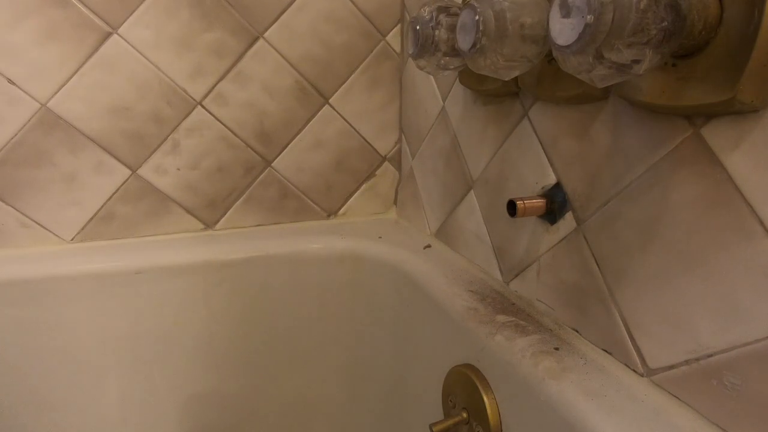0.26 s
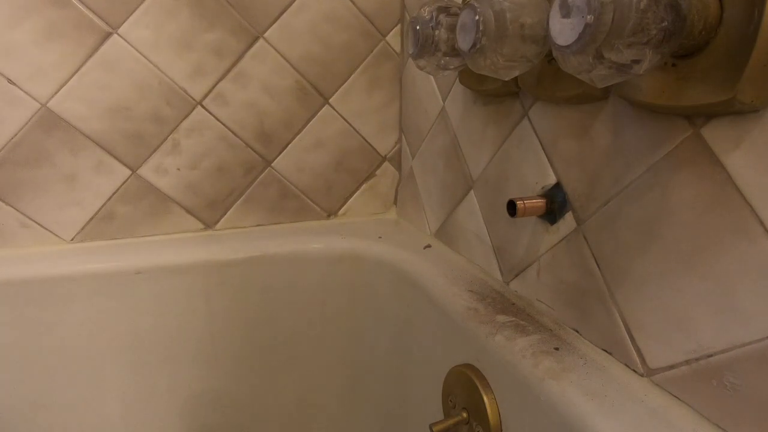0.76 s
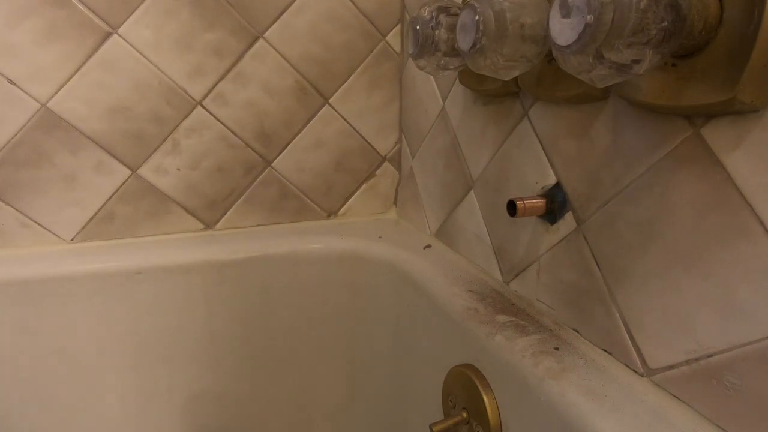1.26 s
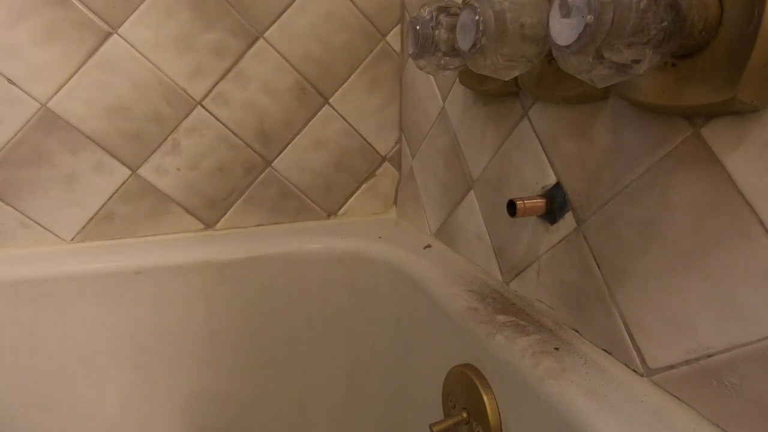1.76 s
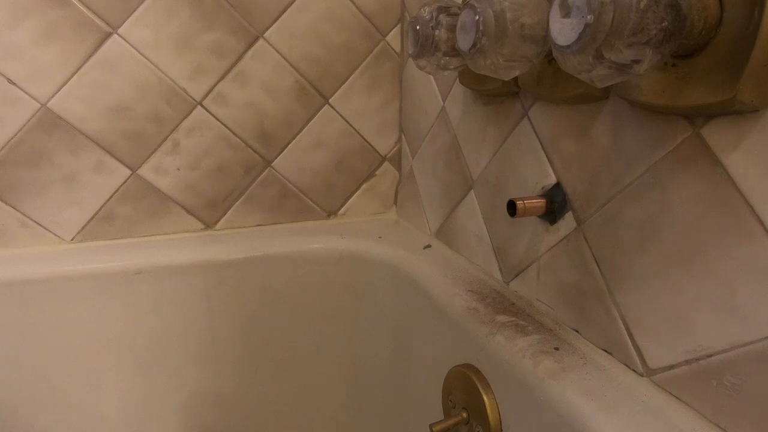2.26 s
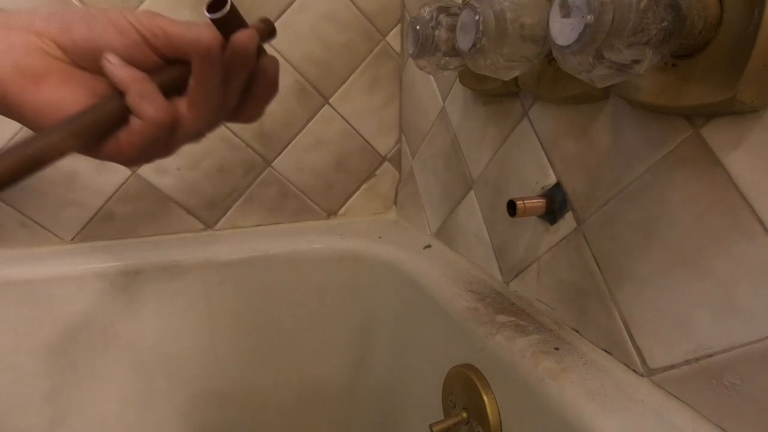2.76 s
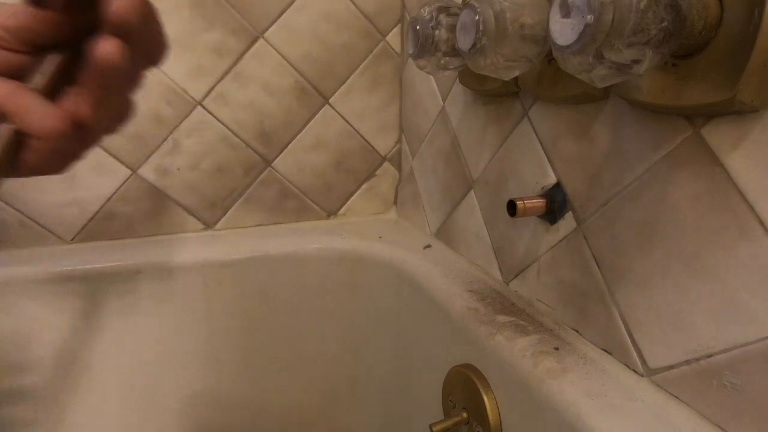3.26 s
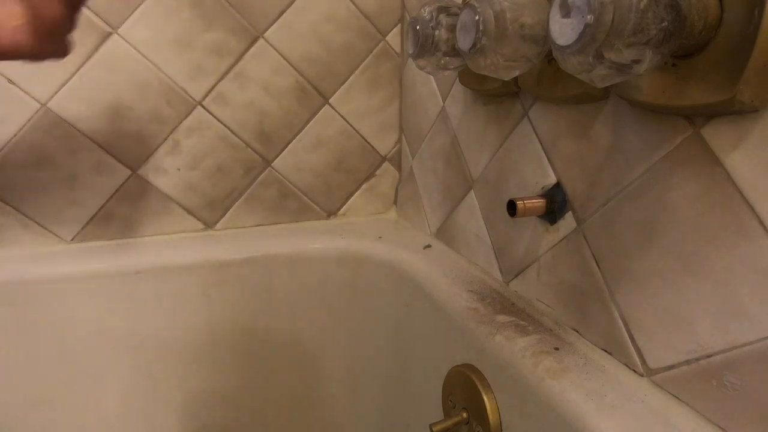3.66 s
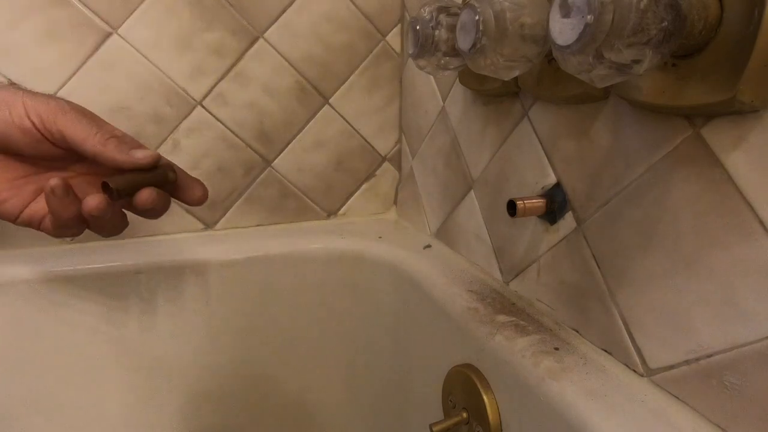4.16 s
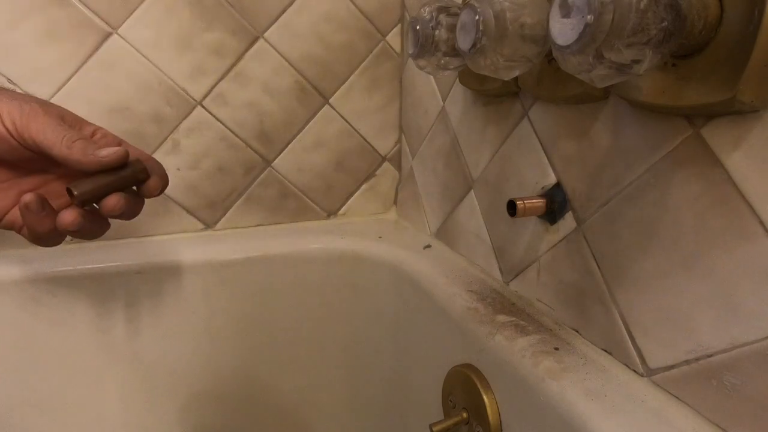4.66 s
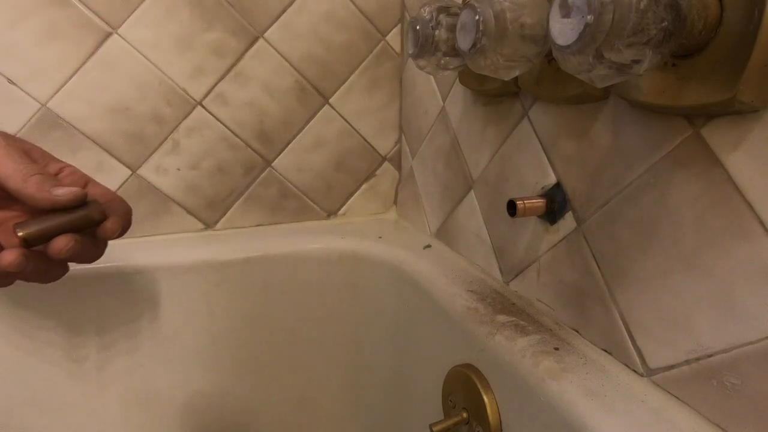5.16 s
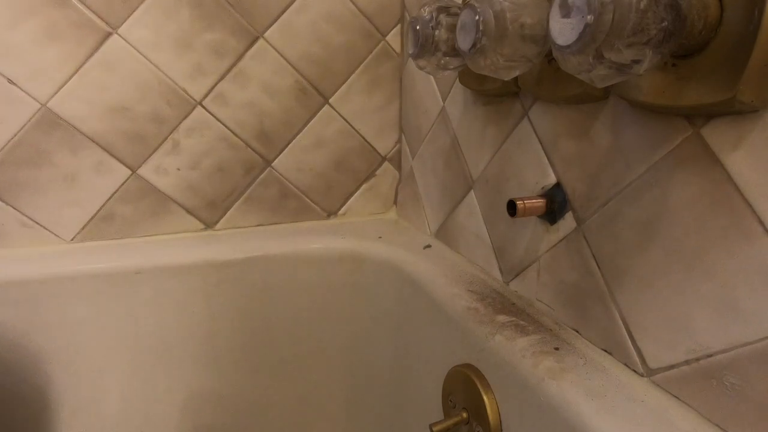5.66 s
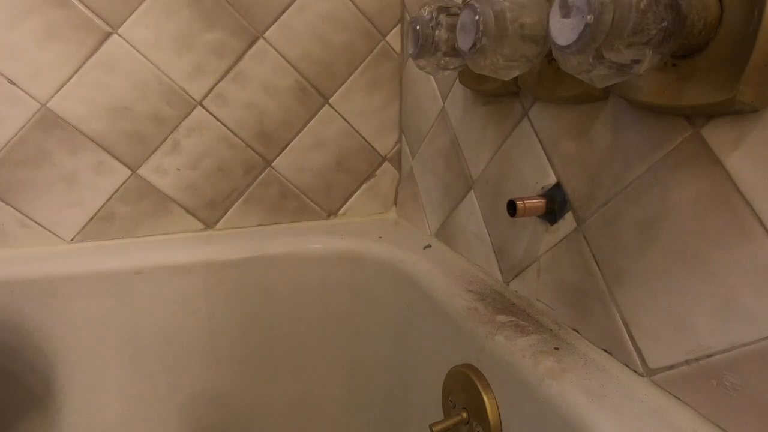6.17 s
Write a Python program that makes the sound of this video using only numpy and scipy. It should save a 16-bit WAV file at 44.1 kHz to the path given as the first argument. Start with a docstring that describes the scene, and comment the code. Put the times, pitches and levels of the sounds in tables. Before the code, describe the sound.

Small metal clicks, a few booming knocks on a tub and two bright, ringing scrapes of copper pipe in a tiled bathroom.

```python
"""A small tiled bathroom, plumbing work over the tub, heard on a stereo pair of microphones.
Above a low, uneven rumble and the room's hush, a tubing cutter clicks, rubs and faintly squeaks on
a copper pipe. It is put down with a few roomy knocks, and the tub booms close by, to the right.
A short copper offcut then sticks and slips along a hard edge in two main strokes, ringing brightly
near the microphones. A last light tap follows from farther off."""
import sys
import numpy as np
from scipy import signal
from scipy.fft import rfft, irfft
from scipy.io import wavfile
from scipy.ndimage import uniform_filter1d

SR = 44100
rng = np.random.default_rng(int(sys.argv[2]) if len(sys.argv) > 2 else 0)


def digitize_waveform(pressure):
    """Quantize a signal to 16-bit integers and store it at the path in sys.argv[1].

    Rows of a 2-D input are taken as channels; values are limited to [-1, 1].
    """
    field = np.atleast_2d(pressure).T
    bounded = np.clip(field, -1, 1)
    quanta = np.round(bounded * 32767).astype(np.int16)
    wavfile.write(sys.argv[1], SR, quanta)


N = 282681


def from_db(db):
    """Decibels to gain."""
    return 10 ** (np.asarray(db) / 20)


def rms_one(x):
    """Scale to rms 1."""
    return x / np.sqrt(np.mean(x ** 2) + 1e-20)


def energy_one(x):
    """Scale a response so that white noise keeps its level through it."""
    return rms_one(x) / np.sqrt(x.shape[-1])


def at_hz(points, hz):
    """Read a table on a log-frequency axis."""
    f, value = np.transpose(points)
    return np.interp(np.log(np.maximum(hz, 1)), np.log(f), value)


def drift(per_s):
    """A random wander between knots of spread 1."""
    knots = rng.standard_normal(int(N / SR * 200))
    return np.interp(np.arange(N) / SR * per_s, np.arange(len(knots)), knots)


def through(x, response):
    """Pass a signal through a response."""
    return signal.fftconvolve(x, response, axes=-1)[..., :N]


def add(track, start_s, sound):
    """Lay a short sound into a track."""
    i = max(round(start_s * SR), 0)
    track[i:i + len(sound)] += sound[:N - i]


def bandpass(x, edges_hz):
    """Keep the band between two edges."""
    return signal.sosfilt(signal.butter(2, edges_hz, "band", fs=SR, output="sos"), x)


def colour(spectrum, extra_db=lambda hz: 0, size=8192):
    """Causal (minimum-phase) response of energy 1 with the given spectral shape."""
    hz = np.maximum(np.arange(size // 2 + 1) * SR / size, 1)
    cepstrum = irfft(np.log(from_db(at_hz(spectrum, hz) + extra_db(hz))))
    cepstrum[0], cepstrum[size // 2:] = 0, 0
    return energy_one(irfft(np.exp(rfft(2 * cepstrum))))


def hump(hz, centre_hz, octaves, skirt_db=11):
    """A broad spectral hump, in dB."""
    return -skirt_db * np.log10(1 + (np.log2(hz / centre_hz) / octaves) ** 4)


def lift(hz, peaks):
    """Bell-shaped peaks or dips in a spectrum, in dB."""
    return sum(db / (1 + (2 * (hz - centre) / width) ** 2) for centre, width, db in peaks)


def panned(x, pan_db):
    """Place a sound between the microphones; pan_db is left minus right."""
    return x * from_db([[pan_db / 2], [-pan_db / 2]])


# spectrum of the rumble: f/Hz, relative level/dB
RUMBLE_SPECTRUM = [(15, -38), (24, -22), (34, -4.5), (44, -4.5), (63, 5.5), (72, -8.5), (90, -5), (103, 0),
                   (119, -3), (133, -13), (160, -16.5), (260, -69.5)]
# its swells and dips, in two consecutive runs: t/s, level/dB
RUMBLE_SWELLS = [
    [(0.0, -37), (0.19, -49.5), (0.47, -41.5), (0.53, -57.5), (0.58, -39.5), (1.41, -44), (2.16, -44.5),
     (2.18, -56), (2.5, -38)],
    [(2.85, -39.5), (3.75, -55), (3.76, -44), (4.79, -40), (4.98, -52.5), (5.96, -37), (6.06, -60.5),
     (6.12, -43.5), (6.41, -37)],
]
def rumble(pan_db=-8, side_db=-18, steady_s=0.25, waver_db=3.0):
    """Low noise wavers in the room's lowest resonances, stronger at the right microphone."""
    white = rng.standard_normal((2, N + SR))
    mid, side = signal.fftconvolve(white, colour(RUMBLE_SPECTRUM)[None], axes=-1)[:, SR:SR + N]
    pair = mid + from_db(side_db) * side * [[1], [-1]]
    steady = pair / np.sqrt(uniform_filter1d(mid ** 2, int(steady_s * SR)) + 1e-3)
    swell_db = np.interp(np.arange(N) / SR, *np.vstack(RUMBLE_SWELLS).T)
    return panned(steady * from_db(swell_db + waver_db * drift(14)), pan_db)


# likeness of the two microphones: f/Hz, correlation (clipped to -1..1)
MIC_LIKENESS = [(60, -1), (130, 1.75), (290, -0.32), (640, -0.93), (1300, -0.26), (2800, 0.47),
                (6800, -0.16), (14000, -1)]
# their balance: f/Hz, left minus right level/dB
MIC_BALANCE = [(60, -6.5), (200, -7), (400, -3), (800, -3), (2400, -0.5), (4500, -1.5), (8000, 0),
               (14000, 3.5)]
BAND_EDGES_HZ = 20 * 2 ** np.arange(0, 10, .5)
def diffuse_bands(size):
    """Half-octave bands of white noise as the two microphones hear a diffuse field."""
    white = rng.standard_normal((2, 2, size + SR // 2))
    sides = np.array([[1], [-1]])
    for k, edges in enumerate(zip(BAND_EDGES_HZ, BAND_EDGES_HZ[1:])):
        mid, side = bandpass(white[k % 2], edges)[:, -size:]
        hz = np.sqrt(np.prod(edges))
        alike = np.clip(at_hz(MIC_LIKENESS, hz), -1, 1)
        pan = rms_one(from_db(sides * at_hz(MIC_BALANCE, hz) / 2))
        yield hz, pan * (np.sqrt(1 + alike) * mid + np.sqrt(1 - alike) * side * sides)


# spectrum of the room's hush: f/Hz, relative level/dB
HUSH_SPECTRUM = [(100, -15.5), (150, 0.5), (200, 0.5), (245, 5.5), (330, -5), (440, -11.5), (600, -19),
                 (820, -4), (1100, -20.5), (2500, -30.5), (4000, -32), (6200, -29), (8500, -40),
                 (12500, -41.5), (14500, -62)]
def room_tone(level_db=-57.5, flutter_db=1.0, pan_db=1.5):
    """A steady hush from all round the microphones."""
    hush = sum(band * from_db(at_hz(HUSH_SPECTRUM, hz) + flutter_db * drift(11))
               for hz, band in diffuse_bands(N))
    return panned(from_db(level_db) * rms_one(hush), pan_db)


# reverberation of the bathroom: f/Hz, t60/s
TILE_DECAY = [(80, 0.51), (240, 0.34), (450, 0.39), (1300, 0.37), (3000, 0.31), (7000, 0.33), (13000, 0.2)]
def room_response(direct_db, build_s=0.00065):
    """The direct sound, then a dense tail from the close tiled walls."""
    t = np.arange(SR * 3 // 4) / SR
    tail = sum(band * np.exp(-np.log(1000) * t / at_hz(TILE_DECAY, hz))
               for hz, band in diffuse_bands(len(t)))
    response = energy_one(tail * (1 - np.exp(-t / build_s)))
    response[:, 0] += from_db(direct_db)
    return energy_one(response)


def bathroom(x, direct_db, pan_db):
    """A source at one place in the room; more direct sound brings it nearer the microphones."""
    return panned(through(x[None], room_response(direct_db)), pan_db)


def stroke(start_s, length_s, attack_s=.012, sag_db_per_s=13, release_db_per_s=399.5):
    """Gain of one sliding contact: attack, sagging hold, release; by default a light rub."""
    t = np.maximum(np.arange(N) / SR - start_s, 0)
    fall_db = sag_db_per_s * t + release_db_per_s * np.maximum(t - length_s, 0)
    return np.minimum(t / attack_s, 1) * from_db(-np.minimum(fall_db, 200))


def slips(per_s, size_db, judder_db):
    """Stick and slip: tiny clicks of uneven size that come in bunches; rms 1."""
    sizes = from_db(size_db * np.minimum(rng.exponential(1, N), 4) + judder_db * drift(70))
    signs = rng.choice([-1, 1], N)
    slipping = rng.random(N) < per_s / SR
    return rms_one(sizes * signs * slipping)


def rub(contacts, octaves, per_s):
    """Light friction; each contact favours its own pitch range."""
    gains = np.array([stroke(s, length) for s, length, *_ in contacts])
    _, _, level_db, centre_hz = np.transpose(contacts)
    out = 0
    for edges in zip(BAND_EDGES_HZ[7:17], np.minimum(BAND_EDGES_HZ[8:18], 7000)):
        band = bandpass(slips(per_s, size_db=2.38, judder_db=1.5) + 1e-18, edges)
        band_db = level_db + hump(np.sqrt(np.prod(edges)), centre_hz, octaves)
        out = out + rms_one(band) * (from_db(band_db) @ gains)
    return out


def chatter(decay_s):
    """A snap breaks into a few milliseconds of tiny contacts; energy 1."""
    t = np.arange(SR // 25) / SR
    return energy_one(rng.standard_normal(len(t)) * np.exp(-t / decay_s))


# the cutter rubbing on the pipe: t/s, length/s, relative level/dB, centre f/Hz
CUTTER_RUBS = [(0.0, 0.005, -39, 2750), (.12, 0.17, -68.5, 2400), (.325, 0.013, -55, 2140),
               (.395, 0.012, -63, 1900), (.94, 0.093, -64.5, 4500)]
# its clicks: t/s, level/dB, centre f/Hz, width/octaves
CUTTER_CLICKS = [(0.016, -14, 2700, 1.5), (0.072, -4, 3200, 1.23), (0.085, -16, 3400, 2.9),
                 (0.098, -38, 3630, 1.5), (0.206, -25.5, 2500, 1.4), (0.530, -39.5, 3470, 0.82),
                 (0.926, -22.5, 5800, 1.46), (1.006, -24.5, 3900, 1.3), (1.123, -25, 4430, 0.43),
                 (1.285, -35, 4900, 0.14)]
# spectrum of a click: f/Hz, relative level/dB
CLICK_SPECTRUM = [(200, 2), (800, -4), (1400, -8), (2400, -1), (3300, -3.5), (4200, -9.5), (5600, -21),
                  (7400, -0.5), (8200, -12), (9000, -17), (13000, -29), (16000, -36)]
# resonances of the cutter on the pipe: f/Hz, width/Hz, lift/dB
CUTTER_RESONANCES = [(1860, 430, 8), (2410, 190, 5.5), (3304, 180, 1.5), (5250, 820, 12.5),
                     (6150, 730, 13.5)]
def cutter(rub_db=-4):
    """Small steel parts snap and rub against the pipe; each contact favours its own range."""
    friction = rub(CUTTER_RUBS, octaves=0.36, per_s=2700)
    resonance = colour([(20, 0), (20000, 0)], lambda hz: lift(hz, CUTTER_RESONANCES))
    out = from_db(rub_db) * through(friction, resonance)
    for s, db, centre_hz, width in CUTTER_CLICKS:
        snap = colour(CLICK_SPECTRUM, lambda hz: lift(hz, CUTTER_RESONANCES) + hump(hz, centre_hz, width))
        add(out, s, from_db(db) * through(snap, chatter(decay_s=0.0023)))
    return out


# a faint squeak of the cutter's wheel: t/s, length/s, level/dB, f/Hz
WHEEL_SQUEAKS = [(1.265, .13, -76, 2530)]
def squeak(waver_hz=18):
    """The cutting wheel sings on one wavering pitch."""
    out = 0
    for s, length, db, hz in WHEEL_SQUEAKS:
        phase = 2 * np.pi * np.cumsum(hz + waver_hz * drift(80)) / SR
        out = out + from_db(db) * stroke(s, length) * np.sin(phase)
    return out


# tool and pipe skidding as they are handled: t/s, length/s, level/dB, centre f/Hz
HANDLING_SKIDS = [(2.08, 0.032, -54.5, 5200), (2.38, 0.041, -53, 3500), (2.45, 0.077, -48, 445),
                  (3.44, .18, -75, 5380), (5.012, 0.094, -50.5, 1065), (5.345, 0.044, -66, 1146)]
# the tool set down on the tub: t/s, level/dB, contact cut-off f/Hz, boom re knock/dB
TOOL_KNOCKS = [(2.085, -14, 7000, -6), (2.107, -2.5, 1110, 2.5), (2.384, -10, 7550, -16),
               (2.402, -19.5, 7630, 8), (2.570, 11, 5800, 2), (2.577, -7.5, 4800, 13.5),
               (2.594, 6, 4840, -8)]
# spectrum of a knock: f/Hz, relative level/dB
KNOCK_SPECTRUM = [(60, 3), (200, 4), (380, 4.5), (600, -2), (950, 0.5), (1300, 1.5), (1800, -4), (3000, -3),
                  (4400, -18), (4830, -7), (5300, -17), (7600, -15.5), (9000, -40), (12500, -22.5),
                  (14000, -52.5)]
def knocks(softness_db=15):
    """The tool skids and clacks on the tub, duller when the contact is soft."""
    out = rub(HANDLING_SKIDS, octaves=0.31, per_s=1600)
    for s, db, cut_hz, _ in TOOL_KNOCKS:
        clack = colour(KNOCK_SPECTRUM, lambda hz: -softness_db * np.log10(1 + (hz / cut_hz) ** 2))
        add(out, s, from_db(db) * clack)
    return out


def struck_body(modes):
    """A struck thing rings as dying sines of alternating sign; energy 1."""
    t = np.arange(SR // 2) / SR
    ring = 0
    for k, (hz, db, t60) in enumerate(modes):
        mode = energy_one(np.sin(2 * np.pi * hz * t) * np.exp(-np.log(1000) * t / t60))
        ring = ring + from_db(db) * mode * (-1) ** k
    return energy_one(ring)


# modes of the tub: f/Hz, relative level/dB, t60/s
TUB_MODES = [(85, -1.5, 0.036), (97.25, -1, 0.11), (173.3, -16.5, 0.075), (236.4, -11, 0.37),
             (364.3, -8, 0.096), (394.4, -17, 0.1)]
def tub_boom(swell_s=0.017):
    """The heavy tub takes a moment to answer each knock."""
    ring = struck_body(TUB_MODES)
    t = np.arange(len(ring)) / SR
    boom = energy_one(ring * (1 - np.exp(-t / swell_s)))
    out = np.zeros(N)
    for s, db, _, boom_db in TOOL_KNOCKS:
        add(out, s, from_db(db + boom_db) * boom)
    return out


# a faint slide of fingers on the pipe (first row), then the offcut along the edge: t/s, length/s, rasp
# level/dB, ring level/dB, ring tilt/(dB per octave)
OFFCUT_STROKES = [(3.532, 0.1, -89, -72, -1.5), (4.358, 0.019, -36, -39, -9),
                  (4.421, 0.15, -36.5, -26.5, -4.5), (4.679, 0.16, -35, -18, -1.5),
                  (5.001, 0.07, -53, -52.5, -8.5), (5.34, 0.032, -91, -60.5, -3)]
def pressure():
    """The offcut bites at once, eases as it travels and lets go; one row of gain per stroke."""
    return np.array([stroke(s, length, attack_s=.002, sag_db_per_s=13.5, release_db_per_s=290.5)
                     for s, length, *_ in OFFCUT_STROKES])


# the offcut striking the edge: t/s, level/dB
OFFCUT_CLINKS = [(4.364, -13.5), (4.418, 1), (4.565, 3.5), (4.676, 10.5), (4.721, 10.5), (5.032, -19),
                 (5.342, -32.5)]
def touches():
    """The offcut's few firm contacts with the edge, one impulse each."""
    out = np.zeros(N)
    for s, db in OFFCUT_CLINKS:
        add(out, s, from_db([db]))
    return out


# spectrum of the scraping: f/Hz, relative level/dB
RASP_SPECTRUM = [(60, -6.5), (170, 7.5), (240, 10.5), (400, 6.5), (600, -4), (1000, -2.5), (1500, -5),
                 (2200, -8), (3200, -3.5), (4100, -16.5), (5500, -19), (7200, -7.5), (8900, -22),
                 (11000, -27), (12200, -38.5), (15000, -46.5)]
# slight narrow ripples in the scraping's spectrum: f/Hz, width/Hz, level change/dB
RASP_RIPPLES = [(983, 30, 0.5), (1350, 60, -1)]
def offcut_rasp(tick_db=-10):
    """Tiny slips rasp on the edge, and the firm contacts tick."""
    _, _, rasp_db, _, _ = np.transpose(OFFCUT_STROKES)
    friction = slips(per_s=1400, size_db=4.0, judder_db=1.5) * (from_db(rasp_db) @ pressure())
    edge = colour(RASP_SPECTRUM, lambda hz: lift(hz, RASP_RIPPLES))
    return through(friction + touches() * from_db(tick_db), edge)


# modes of the copper offcut, held in the fingers: f/Hz, relative level/dB, t60/s
COPPER_MODES = [(2621, -13, .14), (4857, -4, .11), (5987, -8, .14), (6051, -9, .15), (6142, -15, .1),
                (6378, -12, .16), (6793, -12, .16), (7498, -15, .14), (7554, -9, .16), (7588, -12, .16),
                (8439, -20, .2), (9674, -25, .13), (9728, -25, .13), (10507, -24, .13), (11140, -28, .1),
                (12736, -26, .1), (12880, -31, .1), (13480, -35, .1), (13630, -36, .1), (14510, -41, .1),
                (14680, -41, .1)]
def offcut_ring(wander_db=1.5, wobble_rad=0.402, side_db=-1.5, reach_hz=240):
    """Slips and contacts set the tube ringing into the room, close to the microphones."""
    _, _, _, ring_db, tilt = np.transpose(OFFCUT_STROKES)
    friction = slips(per_s=970, size_db=2.0, judder_db=4.0)
    room = room_response(direct_db=4)
    hits, pressed, out = touches(), pressure(), 0
    for hz, db, t60 in COPPER_MODES:
        stroke_gain = from_db(ring_db + tilt * np.log2(hz / 6000)) @ pressed
        # the contact point travels, so each mode is fed by a share of its own
        drive = hits + friction * stroke_gain * from_db(wander_db * drift(25))
        pole = np.exp((2j * np.pi * hz - np.log(1000) / t60) / SR)
        # a mode takes up only the friction near its own pitch, so the gaps between modes stay dark
        uptake = np.exp((2j * np.pi * hz - np.pi * reach_hz) / SR)
        steady = signal.lfilter([1], np.poly([pole, uptake]), drive + 1e-18)
        # the shifting load of edge and fingers makes the pitch waver
        ring = np.imag(steady * np.exp(1j * wobble_rad * drift(60)))
        # the tube moves about, so the room's peaks and dips even out and each mode keeps its energy
        mid, side = [rms_one(heard) for heard in through(ring[None], room)]
        pair = (mid + from_db(side_db) * side * [[1], [-1]]) / np.sqrt(2)
        out = out + from_db(db) * np.std(drive) * pair
    return out


# the last tap and its bounce: t/s, level/dB
LAST_TAPS = [(6.204, -38.5), (6.242, -17.5), (6.246, -25)]
# its hollow ring: f/Hz, relative level/dB, t60/s
HOLLOW_MODES = [(1414, 4, 0.033), (1580, 4.5, 0.047), (1784, 0.5, 0.011), (2573, 2.5, 0.037),
                (3050, -1.5, 0.033), (3290, -4, .02), (4100, -11.5, 0.0067), (5560, -15, .005)]
def tap():
    """Something light is touched, with a small bounce."""
    out = np.zeros(N)
    for s, db in LAST_TAPS:
        add(out, s, from_db(db) * struck_body(HOLLOW_MODES))
    return out


def scene():
    """Each source at its own distance from the microphones, over the rumble and the hush."""
    cutting = bathroom(cutter() + squeak(), direct_db=-3.5, pan_db=0.5)
    clacks = bathroom(knocks(), direct_db=-16.5, pan_db=-0.4)   # nearly all reflections
    boom = bathroom(tub_boom(), direct_db=5.0, pan_db=-9)   # close, to the right
    rasp = bathroom(offcut_rasp(), direct_db=-8, pan_db=-2.0)
    ring = panned(offcut_ring(), pan_db=-6.0)
    last_tap = bathroom(tap(), direct_db=-11.5, pan_db=-0.5)
    return rumble() + room_tone() + cutting + clacks + boom + rasp + ring + last_tap


def record(dry, cutoff_hz=14900):
    """Both microphone channels pass a steep low-pass filter."""
    return signal.sosfilt(signal.ellip(10, .1, 90, cutoff_hz, fs=SR, output="sos"), dry)


dry = scene()
out = record(dry)
digitize_waveform(out)
```